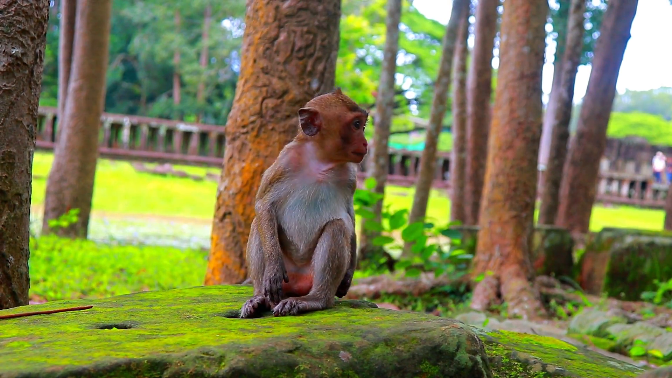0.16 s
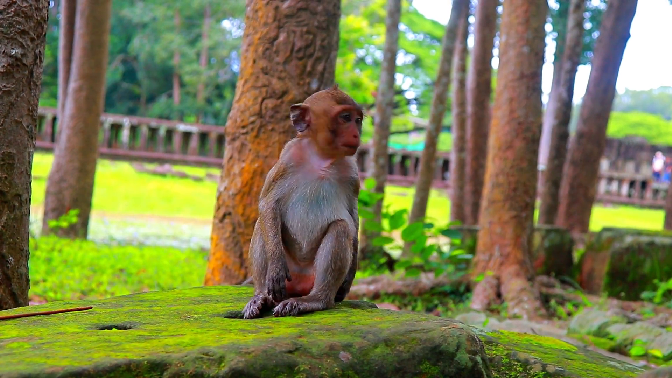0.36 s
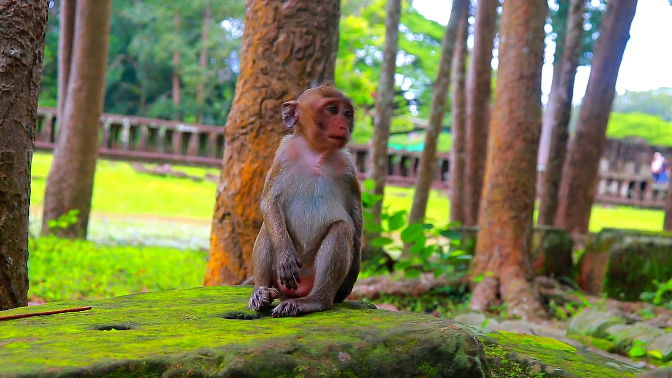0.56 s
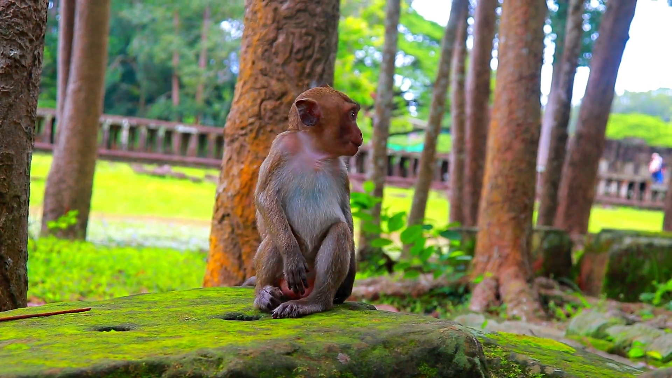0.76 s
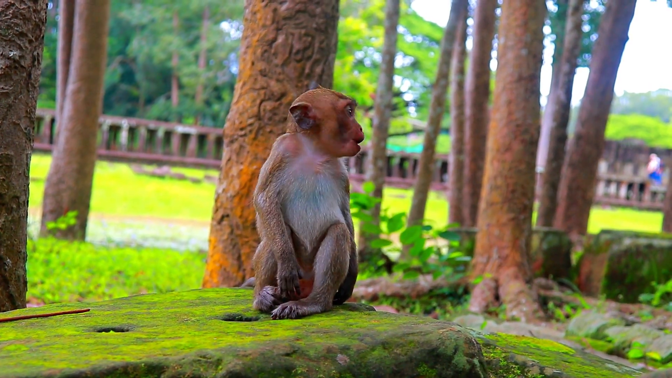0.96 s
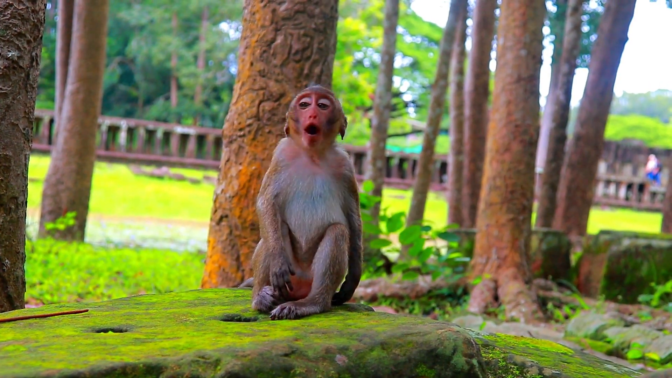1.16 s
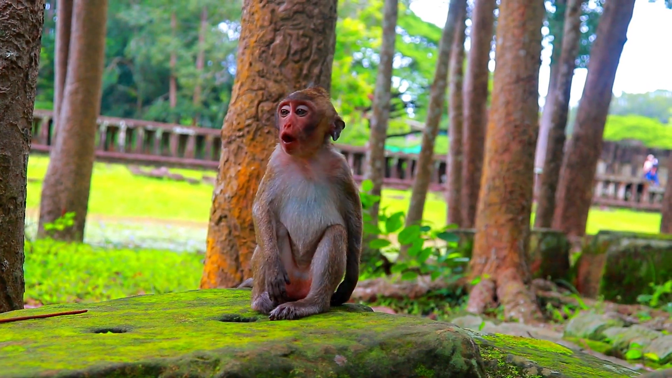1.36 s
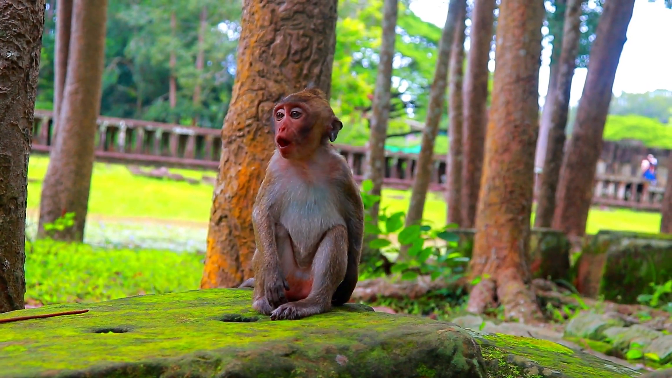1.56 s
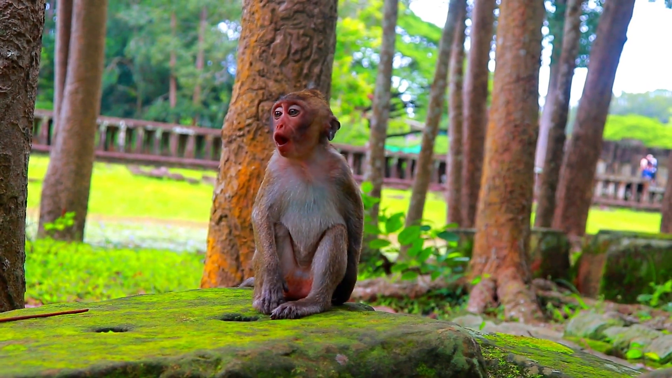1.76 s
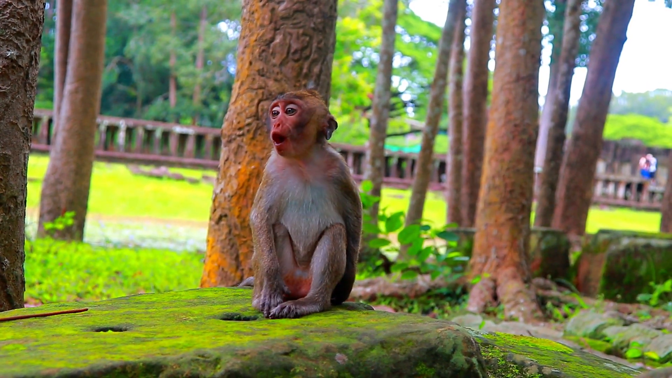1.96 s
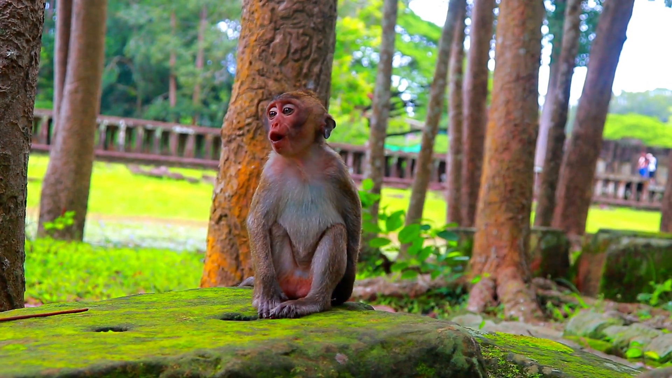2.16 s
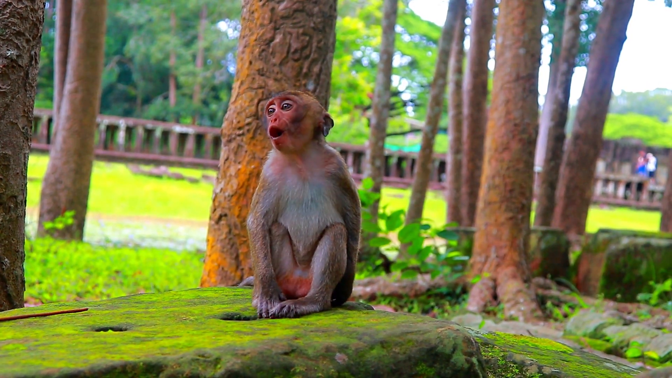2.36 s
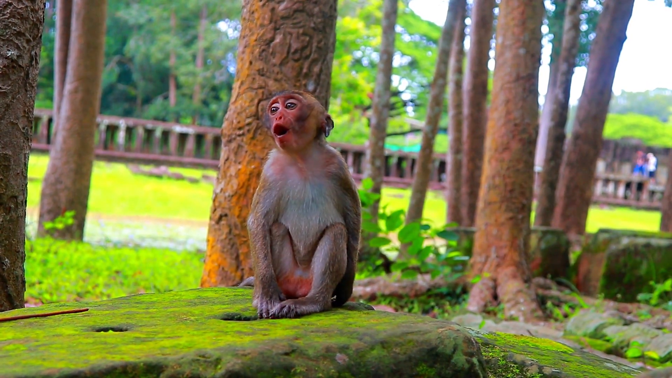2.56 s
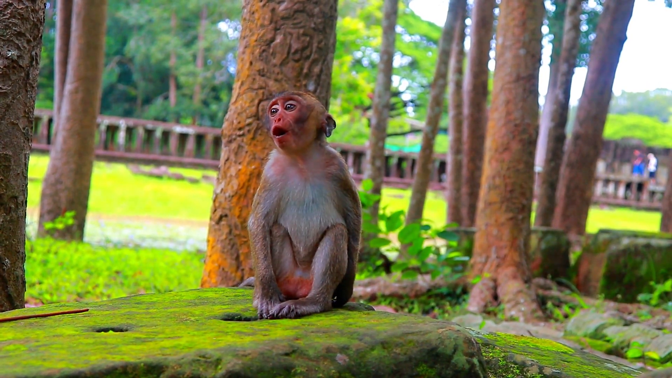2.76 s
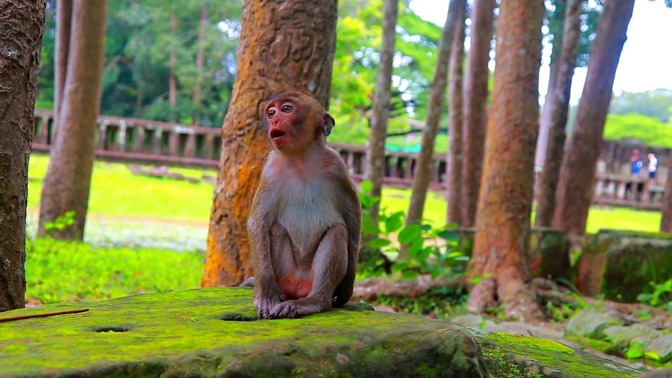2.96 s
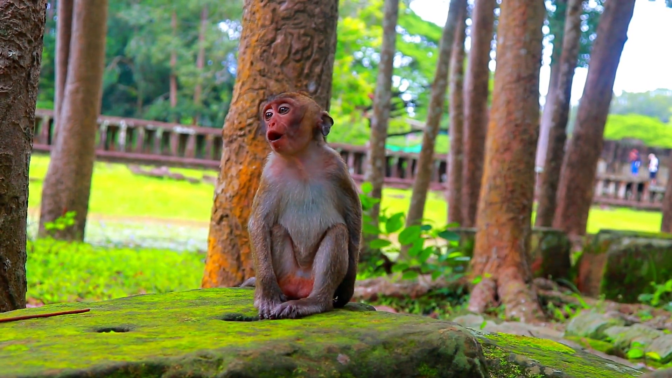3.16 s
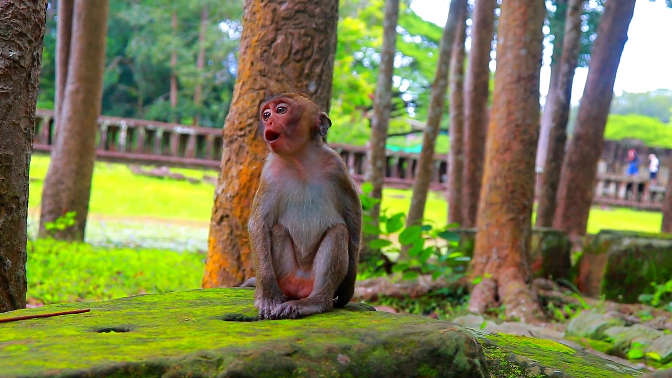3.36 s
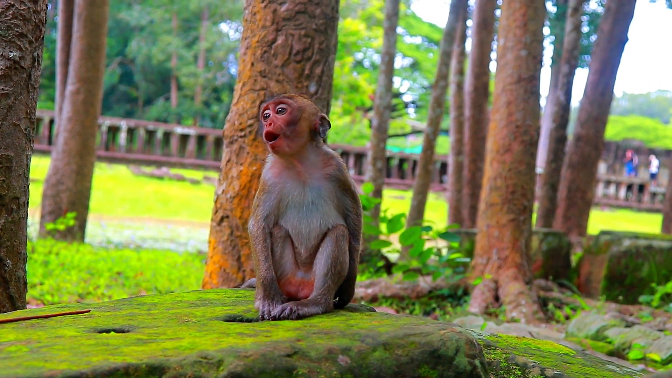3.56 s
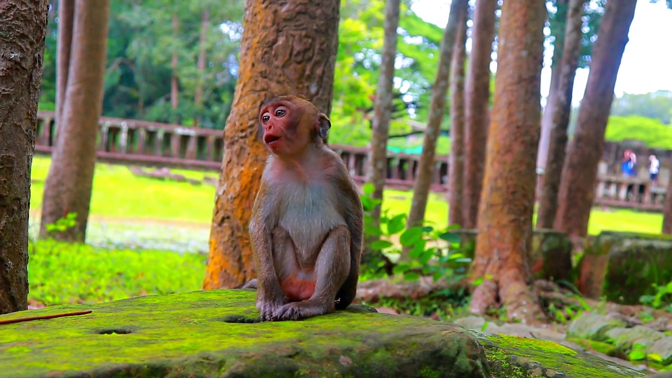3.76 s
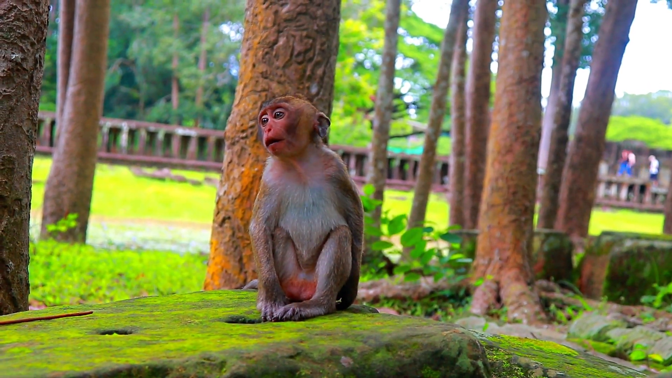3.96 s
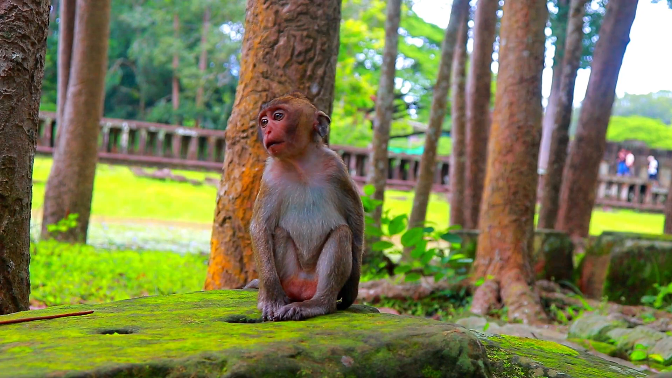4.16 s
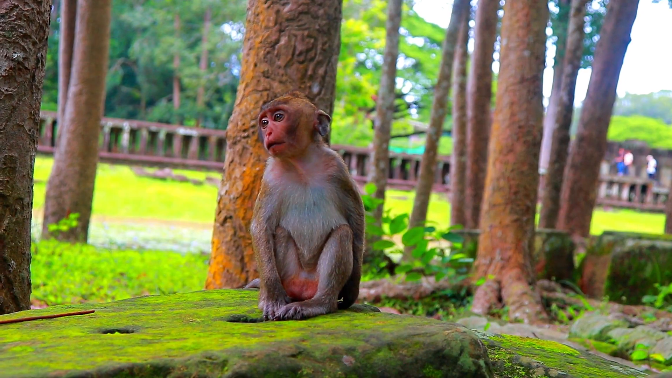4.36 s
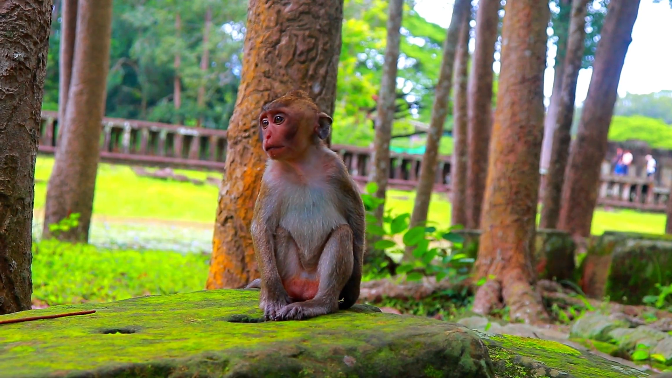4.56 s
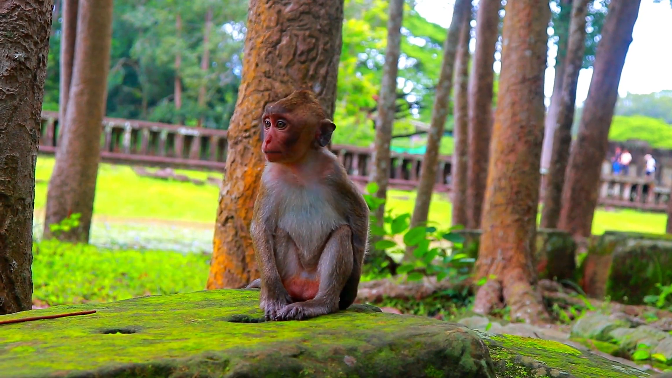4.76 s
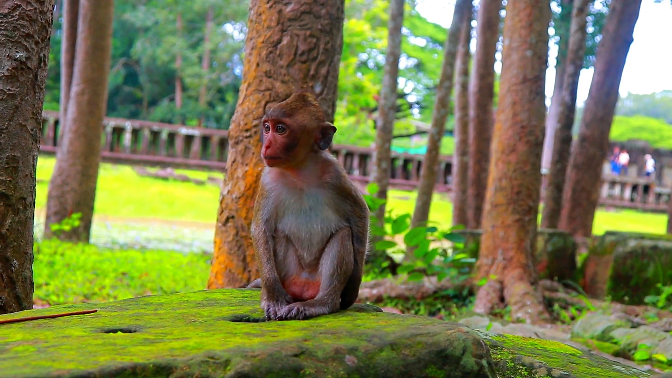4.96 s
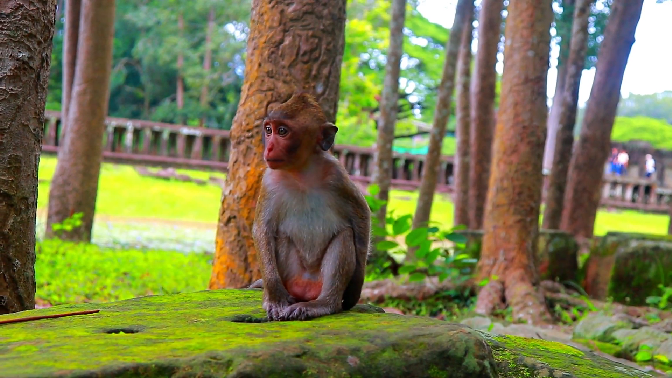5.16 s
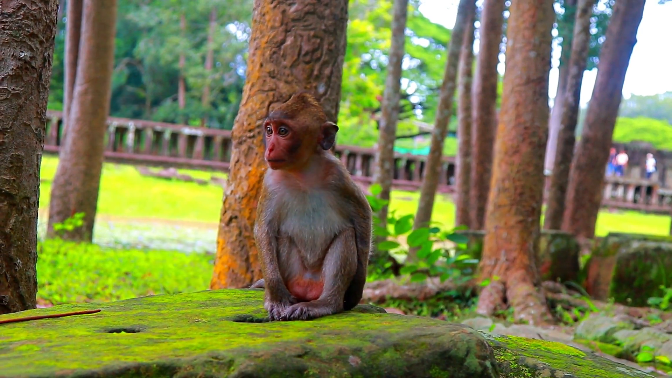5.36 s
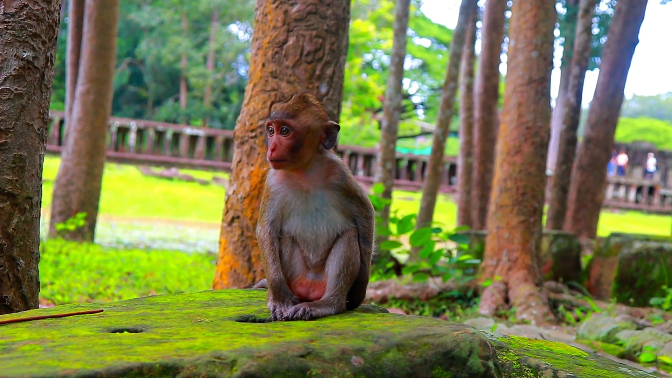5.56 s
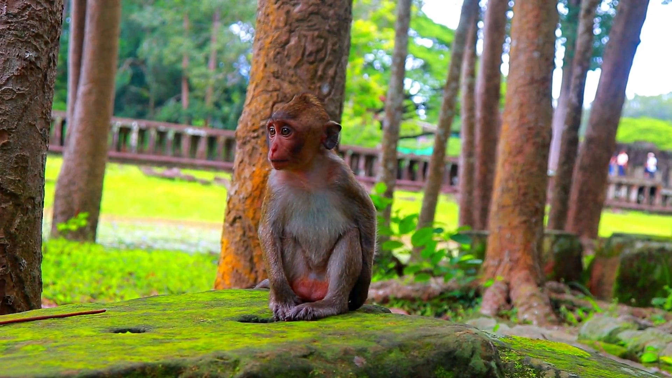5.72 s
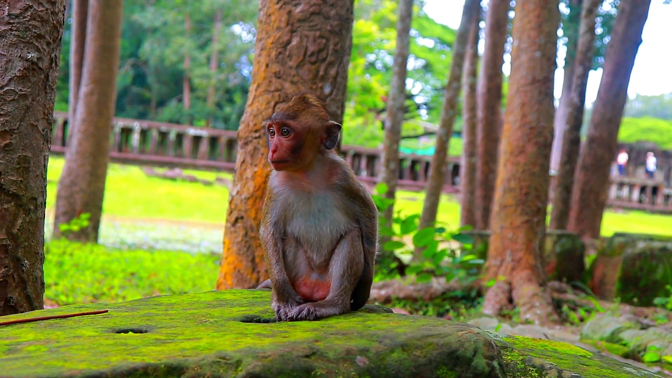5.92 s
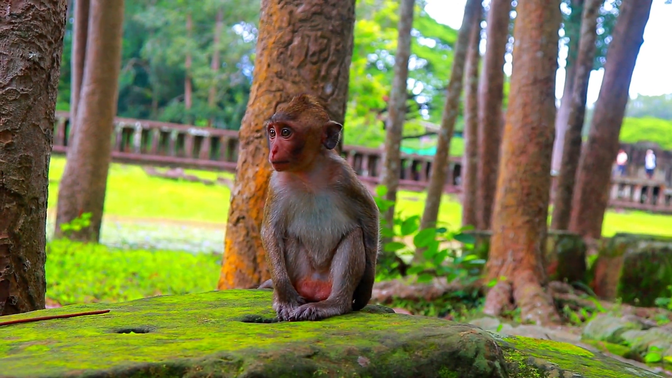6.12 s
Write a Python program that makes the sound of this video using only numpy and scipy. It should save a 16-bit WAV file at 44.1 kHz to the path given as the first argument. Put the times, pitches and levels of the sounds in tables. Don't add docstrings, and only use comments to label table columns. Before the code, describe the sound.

A wooded park is heard in wide stereo: a steady, slightly throbbing low traffic hum under a smooth, soft rustle of leaves, lasting about six seconds. From 0.9 to 1.4 a young monkey close to the microphone gives a clear high coo, starting thin and closed-mouthed, wavering, then clicking into a brighter, open tone near 1.1. Similar coos follow at 1.65-2.1 and 2.35-2.8, almost level around 1150 hertz, brightening midway with a little breath and slight roughness, then quickly dropping off. A fourth runs 3.3-3.7, beginning duller and suddenly brightening. Each leaves thin reflections and a faint tail from trunks and stone. After a pause, at 4.9-5.3, a far-off monkey answers lower, rising from about 500 to 670 hertz, turning hoarse and falling abruptly, blurred by echo. Faint insect buzzes appear at 5.4, then higher at 5.7, nearly buried in the background.

```python
import sys
import numpy as np
from scipy import signal
from scipy.fft import rfft, irfft, next_fast_len
from scipy.io import wavfile
from scipy.ndimage import uniform_filter1d, map_coordinates

SR = 44100
rng = np.random.default_rng(int(sys.argv[2]) if len(sys.argv) > 2 else 0)


def voltage_ratio(level):
    return 10 ** (np.asarray(level, float) / 20)


def unload_wav(signal):
    wavfile.write(
        sys.argv[1],
        SR,
        np.round(np.clip(np.atleast_2d(signal).T, -1, 1) * 32767).astype(np.int16),
    )


N = 272979
TIME = np.arange(N) / SR
TOP_HZ = 15715

# (frequency [Hz], density [dB/Hz])
HUM_SPECTRUM = [(12, -53.5), (22, -21), (39, -11.5), (97, 0.5), (172, -7), (234, -17), (330, -21),
                (360, -20), (420, -22.5), (550, -54), (920, -120)]
# (frequency [Hz], density [dB/Hz])
LEAF_SPECTRUM = [(150, -15.5), (250, -7.5), (330, -3), (365, -6.5), (534, -4.5), (593, -5.5), (823, -5.5),
                 (961, -5), (1050, -4), (1270, -4.5), (2440, -6), (4240, -13), (14000, -33.5), (15600, -47)]
# (frequency [Hz], left-right correlation [0-1])
STEREO_LIKENESS = [(60, 0.98), (130, 1), (290, 0.78), (640, 0.71), (1410, 0.26), (3100, 0.15), (6820, 0.11),
                   (15000, 0.03)]
# (frequency [Hz], left minus right [dB])
STEREO_BALANCE = [(60, 0), (110, -0.5), (200, -0.5), (380, -1.0), (700, 1), (1290, -2.5), (2380, -3.5),
                  (4400, -2.5), (8120, -1.5), (15000, 0)]
# (time [s], level [dB])
HUM_LEVEL = [(0, -49), (1.53, -48.3), (2.48, -49.5), (2.69, -52.5), (2.96, -48.5), (6.16, -47.5),
             (6.19, -54.5)]
LEAVES_DB, LEAVES_FOLLOW = -51, 0.45
ROAD_LAG_S = 1.6e-4

# (time [s], pitch [Hz], effort [dB], mouth opening [0-1])
COO_1 = [(.885, 1042, -30, 0.17), (.91, 988, -40, 0.1), (.94, 1038, -34.5, .01), (.97, 1142, -36.5, 0.11),
         (1.083, 1125, -33, 0.4), (1.094, 1160, -27.5, 0.52), (1.2, 1176, -30.5, 0.77),
         (1.29, 1176, -30.5, 0.81), (1.368, 1113, -33, 0.87)]
COO_2 = [(1.65, 1170, -33, 0.97), (1.675, 1133, -32.5, 0.79), (1.72, 1140, -34, 0.81),
         (1.812, 1164, -31.5, 0.85), (1.87, 1172, -29.5, 0.83), (1.95, 1200, -34, .94),
         (1.986, 1192, -32.5, 0.93), (2.02, 1174, -31, 0.88), (2.09, 1106, -31, 0.72)]
COO_3 = [(2.342, 1097, -33.5, 0.87), (2.37, 1108, -33.5, .75), (2.419, 1123, -33.5, 0.78),
         (2.48, 1138, -29.5, 0.78), (2.552, 1143, -29.5, 0.85), (2.603, 1152, -32, 0.93),
         (2.654, 1174, -32, 0.9), (2.715, 1176, -32, 0.88), (2.782, 1097, -32, 0.88)]
COO_4 = [(3.278, 1099, -32.5, 0.51), (3.304, 1161, -37.5, 0.9), (3.352, 1120, -38.5, 0.65),
         (3.379, 1160, -38.5, 0.91), (3.399, 1136, -34, 0.79), (3.45, 1137, -30, 0.76),
         (3.574, 1143, -29.5, 0.81), (3.641, 1137, -29.5, 0.81), (3.696, 1096, -33.5, 0.72)]
COOS = [COO_1, COO_2, COO_3, COO_4]
# (frequency [Hz], width [Hz], level [dB])
BREATH_RINGS = [(1598, 120, 0.5), (2386, 220, 6), (6260, 290, -1.5), (9300, 900, -9), (11800, 1500, -31.5)]
# (frequency [Hz], width [Hz], gain in each coo [dB])
THROAT_RINGS = [(3500, 400, [1, 0, -.5, 3]), (4874, 470, [-1, 1.5, -2.5, -7]),
                (5660, 500, [5, 2, -2, -6.5]), (7400, 500, [-0.5, -2.5, -1.5, 4.5]),
                (9420, 610, [2.5, -1.5, -5, 2]), (11700, 700, [7, 1, -3, -6]),
                (13295, 600, [3, -5, -2, -2])]
# (frequency [Hz], width [Hz], gain [dB])
SHUT_RINGS = [(3900, 260, 15), (5050, 540, -10), (9950, 300, 5.5)]
# (level at middle effort [dB], per effort [dB/dB], per mouth gain [dB/dB])
THIRD_LAW = (-54, 1.54, 0.85)
UPPER_LAW = (-52, 1.36, 0.59)
OPEN_DB = [-13.5, -6.5, -11, -5, -3, -14, -26.5, -33.5, -35.5, -44.5]
SHUT_DB = [-33.5, -33, -24.5, -28.5, -32, -39.5, -34, -48.5, -52.5, -48, -61]
# (time [s], dulling before [dB])
PRESS = [
    (1.17, 7.5),
    (1.77, 6.5),
    (2.44, 2.5),
    (3.4, 15.5),
]
# (start [s], length [s], level [dB])
DOUBLING = [
    (1.801, 0.12, -65),
    (2.435, 0.22, -61),
    (3.482, 0.21, -63.5),
]
# (multiple of pitch, level [dB])
HALF_ORDERS = [(1.5, 5.5), (2.5, -3), (3.5, 1.5), (4.5, -19), (5.5, -2.5), (7.5, -2.5)]
# (time [s], click peak [dB], frequency [Hz], width [Hz])
REGISTER_BREAK = (1.0895, -37, 1800, 2500)
ATTACK_S, ATTACK_DB, ATTACK_SHUT = 0.0092, 17, 0.7
RELEASE_S, RELEASE_DB = 0.02, 22
CLOSE_S, CLOSED_S, CLOSE_SHARE = 0.031, 0.01, 0.59
SAG_S, SAG = 0.028, 0.25
SECOND_DB, MOUTH_DB = -24, 40.5
BREATH_DB = -32.5
PRESS_S = 0.018

# (frequency [Hz], left minus right [dB])
CALLER_BALANCE = [(300, -6.5), (1100, 0.5), (2300, -4.5), (3500, -3), (5800, -8), (7000, -0.5),
                  (8200, -7.5), (9300, -1), (10500, -7.5), (11700, -4.5), (15000, -1)]
# (delay [s], left [dB], right [dB])
REFLECTIONS = [
    (.012, -40.5, -25.5),
    (0.034, -45, -51),
    (.072, -39, -30.5),
    (.118, -34.5, -30),
]
# (frequency [Hz], T60 [s])
TREE_DECAY = [(500, 1.5), (1300, 1.8), (2500, 1.4), (5000, .7), (10000, .45)]

# (time [s], pitch [Hz], level [dB], hoarse noise [dB])
FAR_COO = [(4.87, 499, -58, -80), (4.91, 561, -55.5, -76), (4.95, 607, -53, -73), (5, 637, -50, -72),
           (5.06, 659, -46.5, -76), (5.13, 670, -46.5, -55.5), (5.222, 672, -47.5, -53),
           (5.242, 632, -47.5, -52), (5.275, 420, -57, -52)]
# (frequency [Hz], level [dB])
FAR_THROAT = [(600, -34), (1000, 4), (1330, 6), (2000, -19), (2650, -13), (3300, -17), (4000, -21),
              (4700, -23), (5500, -31)]
# (start [s], length [s], frequency [Hz], level [dB])
CHIRPS = [
    (5.42, .21, 4150, -66),
    (5.73, .13, 9100, -76),
]


def unit(x):
    return x / np.sqrt(np.mean(x ** 2) + 1e-20)


def along(points, hz):
    f, v = np.transpose(points)
    return np.interp(np.log(hz + 1), np.log(f + 1), v)


def curves(rows):
    s, *cols = np.transpose(rows)
    return [np.interp(TIME, s, c) for c in cols]


def gate(rows, fade_s):
    to_edge_s = np.minimum(TIME - rows[0][0], rows[-1][0] - TIME)
    return np.clip(to_edge_s / fade_s, 0, 1) ** 2


def wobble(rate_hz):
    knots = rng.standard_normal(int(N * rate_hz / SR) + 4)
    return map_coordinates(knots, [TIME * rate_hz])


def filtered(x, response):
    m = next_fast_len(N + SR // 2)
    return irfft(rfft(x, m) * response(np.fft.rfftfreq(m, 1 / SR)), m)[..., :N]


def rush(spectrum, patchy_db):
    z = signal.stft(rng.standard_normal((2, N)), nperseg=512)[2]
    field = uniform_filter1d(rng.standard_normal(z.shape[1:]), size=6, axis=0)
    field = uniform_filter1d(field, size=14, axis=1)
    pair = signal.istft(z * voltage_ratio(patchy_db * unit(field)), nperseg=512)[1][:, :N]

    def mid_side(hz):
        angle = np.arccos(np.clip(along(STEREO_LIKENESS, hz), -1, 1)) / 2
        return voltage_ratio(along(spectrum, hz)) * [np.cos(angle), np.sin(angle)]

    def bearing(hz):
        lag = np.exp(np.outer([-1j, 1j], np.pi * hz * ROAD_LAG_S))
        return voltage_ratio(np.outer([0.5, -0.5], along(STEREO_BALANCE, hz))) * lag

    mid, side = filtered(pair, mid_side)
    return unit(filtered(np.array([mid + side, mid - side]), bearing))


def background():
    hum_db, = curves(HUM_LEVEL)
    hum = voltage_ratio(hum_db + 0.4 * wobble(6)) * rush(HUM_SPECTRUM, patchy_db=0.4)
    swing_db = LEAVES_FOLLOW * (hum_db - hum_db.mean())
    leaves_db = LEAVES_DB + swing_db + 0.22 * wobble(3.3)
    return hum + voltage_ratio(leaves_db) * rush(LEAF_SPECTRUM, patchy_db=0.37)


def throat_air():
    def throat(f):
        total = 0
        for k, (c, w, db) in enumerate(BREATH_RINGS):
            total = total + (-1) ** k * voltage_ratio(db) * 1j * f * w / (c * c - f * f + 1j * f * w)
        return total

    return unit(filtered(rng.standard_normal(N), throat))


def coo_gestures():
    pitch_hz, effort_db, mouth = curves(np.concatenate(COOS))
    starts, ends = np.transpose([(coo[0][0], coo[-1][0]) for coo in COOS])
    which = np.searchsorted(ends[:-1], TIME)
    attack = np.exp(-np.abs(TIME - starts[which]) / ATTACK_S)

    def ending(span_s):
        return np.clip(1 - (ends[which] - TIME) / span_s, 0, 1)

    effort_db = effort_db - ATTACK_DB * attack - RELEASE_DB * ending(RELEASE_S)
    closing = np.minimum(ending(CLOSE_S) / (1 - CLOSED_S / CLOSE_S), 1) ** 2
    mouth = mouth * (1 - ATTACK_SHUT * attack) * (1 - CLOSE_SHARE * closing)
    pitch_hz = uniform_filter1d(pitch_hz, size=280) * (1 - SAG * ending(SAG_S) ** 2)
    return pitch_hz, effort_db, mouth, which


def harmonic_sizes(pitch_hz, effort_db, second_db, mouth, which, dull_db):
    def law(db, per_effort, per_mouth):
        return db + per_effort * (effort_db + 34) + per_mouth * MOUTH_DB * (mouth - 0.83)

    def ring_db(f):
        return sum(np.take(db, which) * np.exp(-((f - c) / w) ** 2) for c, w, db in THROAT_RINGS)

    def shut_ring_db(f):
        return sum(db * np.exp(-((f - c) / w) ** 2) for c, w, db in SHUT_RINGS)

    shut = voltage_ratio(effort_db) * np.clip((0.7 - mouth) / 0.34, 0, 1)
    third_db = law(*THIRD_LAW) + ring_db(3 * pitch_hz) + 1.5 * wobble(18)
    sizes = [voltage_ratio(effort_db), voltage_ratio(second_db + 0.3 * wobble(25)), voltage_ratio(third_db) + voltage_ratio(SHUT_DB[0]) * shut]
    upper_db = law(*UPPER_LAW) - dull_db
    for k in range(10):
        f = (k + 4) * pitch_hz
        opened = voltage_ratio(upper_db + OPEN_DB[k] + ring_db(f))
        sizes.append(opened + voltage_ratio(SHUT_DB[k + 1] + shut_ring_db(f)) * shut)
    return sizes


def period_doubling(phase):
    doubling = sum(voltage_ratio(db) * gate([(s,), (s + length,)], fade_s=0.06) for s, length, db in DOUBLING)
    partials = 0
    for k, db in HALF_ORDERS:
        partials = partials + voltage_ratio(db + 2.3 * wobble(40)) * np.sin(k * phase + 0.7 * wobble(50))
    return doubling * partials


def register_click():
    s, db, hz, width_hz = REGISTER_BREAK
    t = TIME - s
    return voltage_ratio(db) * np.exp(-(t * width_hz) ** 2) * np.cos(2 * np.pi * hz * t)


def coos():
    pitch_hz, effort_db, mouth, which = coo_gestures()
    phase = 2 * np.pi * np.cumsum(pitch_hz * (1 + 0.0008 * wobble(120))) / SR
    slip = 2.8 * np.clip((REGISTER_BREAK[0] - TIME) / 0.001, 0, 1)
    press_s, dull_db = np.transpose(PRESS)[:, which]
    dull_db = dull_db / (1 + np.exp(np.clip((TIME - press_s) / PRESS_S, -50, 50)))
    second_db = effort_db + SECOND_DB + MOUTH_DB * mouth
    sizes = harmonic_sizes(pitch_hz, effort_db, second_db, mouth, which, dull_db)

    air_db = BREATH_DB - 0.3 * dull_db + 2.4 * wobble(23) + np.maximum(effort_db, second_db)
    voice = voltage_ratio(air_db) * throat_air() * (1 + 0.28 * np.sin(phase))
    for k, size in enumerate(sizes, 1):
        if k <= 3:
            shimmer_db = 0.2 * wobble(60) + 0.15 * wobble(200)
        else:
            shimmer_db = 1.9 * wobble(14) + 1.2 * wobble(90)
        offset = 0.59 * (k - 1) * (k - 2) + (k == 2) * slip
        voice += voltage_ratio(3.0 + shimmer_db) * size * np.cos(k * phase + offset)
    voice += period_doubling(phase)
    return register_click() + voice * sum(gate(coo, fade_s=0.011) for coo in COOS)


def ports(voice):
    def lift(f):
        return voltage_ratio(along([(1300, 3.9), (2000, 2.06)], f))

    def left_path(f):
        notch = (1172 ** 2 - f * f + 1j * f * 8) / (1172 ** 2 - f * f + 1j * f * 130)
        lag = np.exp(-2j * np.pi * f * 1.5e-5)
        return lift(f) * notch * voltage_ratio(along(CALLER_BALANCE, f)) * lag

    return np.array([filtered(voice, left_path), filtered(voice, lift)])


def echoes(x, delay_s, wall_s, wall_db, linger):
    hz, t, z = signal.stft(rng.standard_normal((2, 2 * SR)), SR, nperseg=256)
    trunks = voltage_ratio(4 * rng.standard_normal((2, 1, len(t))))
    near = voltage_ratio(wall_db / (1 + np.exp(np.minimum((t - wall_s) / 0.045, 50))))
    decay = voltage_ratio(-60 * t / (linger * along(TREE_DECAY, hz)[:, None]))
    tail = signal.istft(z * trunks * near * decay, SR, nperseg=256)[1]
    tail = np.pad(tail / np.linalg.norm(tail[0]), [(0, 0), (round(delay_s * SR), 0)])
    return signal.fftconvolve(x[None], tail, axes=1)[:, :N]


def answer():
    pitch_hz, level_db, hoarse_db = curves(FAR_COO)
    phase = 2 * np.pi * np.cumsum(pitch_hz * (1 + 0.013 * wobble(70))) / SR
    stack = 0
    for k in range(1, 9):
        effort_db = 0.6 * (k > 2) * (level_db + 48)
        size_db = along(FAR_THROAT, k * pitch_hz) + 3.5 * wobble(45) + effort_db
        stack = stack + voltage_ratio(size_db) * np.sin(k * phase)
    hoarse = unit(filtered(rng.standard_normal(N), lambda f: np.exp(-((f - 2500) / 200) ** 2)))
    return gate(FAR_COO, fade_s=0.0092) * (voltage_ratio(level_db) * stack + voltage_ratio(hoarse_db) * hoarse)


def chirps():
    out = np.zeros((2, N))
    for s, length, hz, db in CHIRPS:
        noise = rng.standard_normal((2, N))
        buzz = unit(filtered(noise, lambda f: np.exp(-((f / hz - 1) / 0.034) ** 2)))
        out += voltage_ratio(db) * gate([(s,), (s + length,)], fade_s=0.03) * buzz
    return out


def scene():
    voice, far = coos(), answer()
    round_about = filtered(voice, lambda f: voltage_ratio(along([(1300, 5), (2200, 0), (9000, -2)], f)))
    near = ports(voice)
    for s, left_db, right_db in REFLECTIONS:
        near = near + voltage_ratio([[left_db], [right_db]]) * np.roll(round_about, round(s * SR))
    near = near + voltage_ratio(-30.5) * echoes(round_about, delay_s=0.03, wall_s=0.11, wall_db=4, linger=0.9)
    distant = voltage_ratio([[-2.5], [-1.5]]) * far
    distant = distant + voltage_ratio(-0.3) * echoes(far, delay_s=0.003, wall_s=0.05, wall_db=6, linger=1.25)
    return near + distant + chirps() + background()


def band_limit(x):
    return signal.sosfilt(signal.butter(12, 15620, fs=SR, output="sos"), x)


def record(dry):
    mix = filtered(dry, lambda hz: hz < TOP_HZ)
    return band_limit(mix)


dry = scene()
out = record(dry)
unload_wav(out)
```